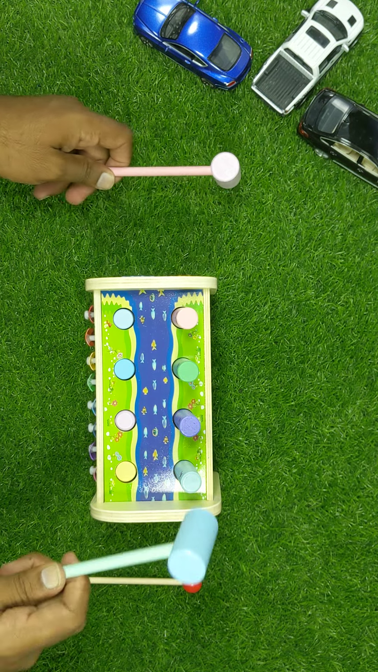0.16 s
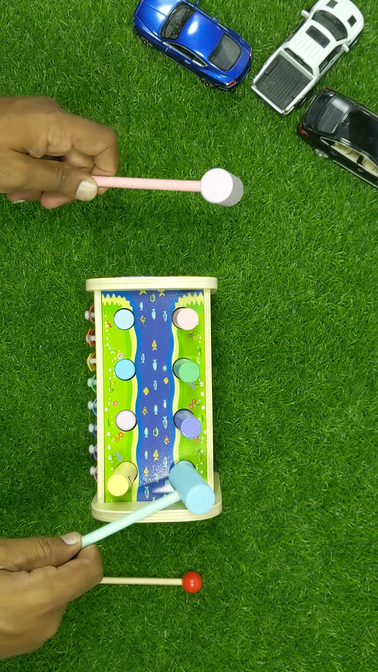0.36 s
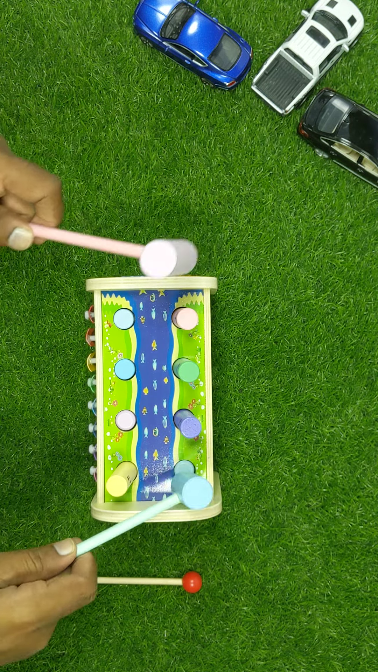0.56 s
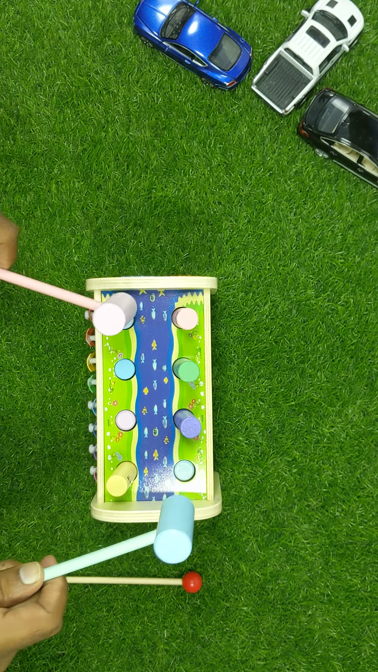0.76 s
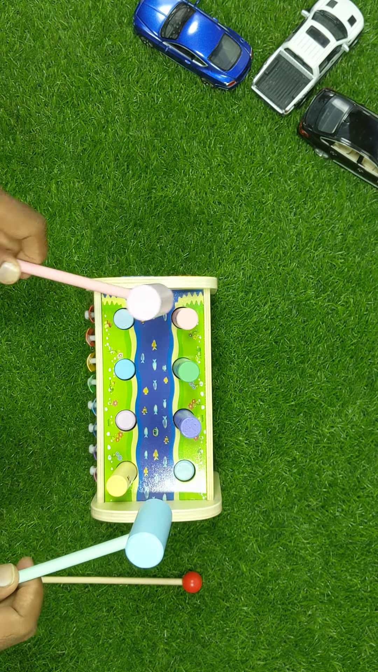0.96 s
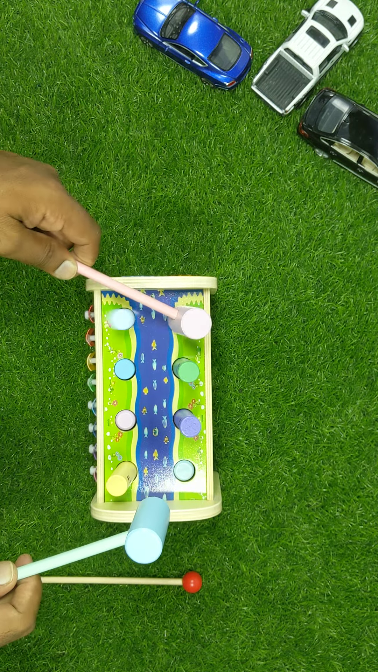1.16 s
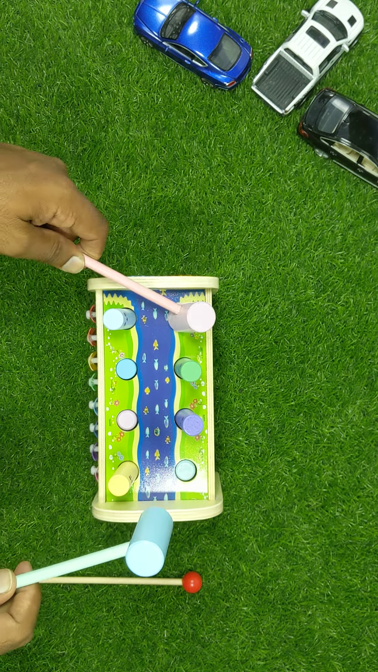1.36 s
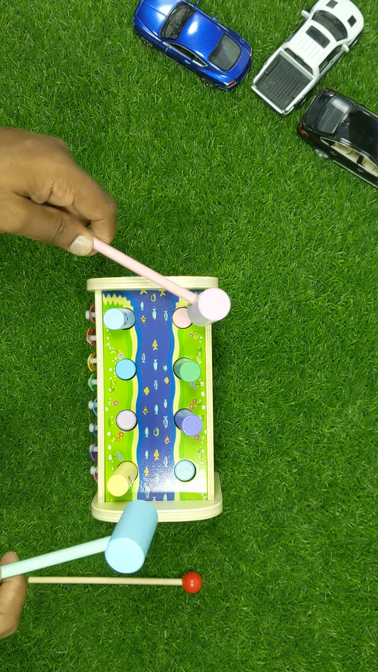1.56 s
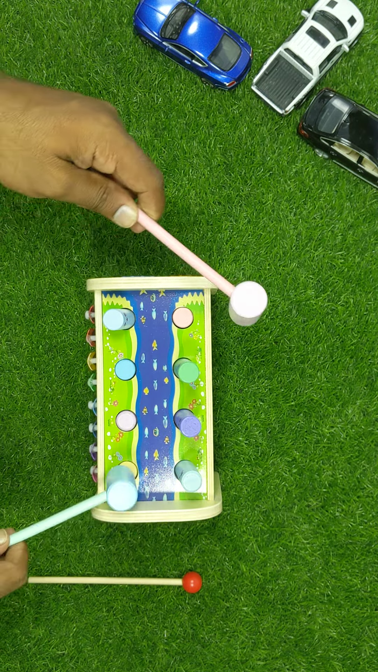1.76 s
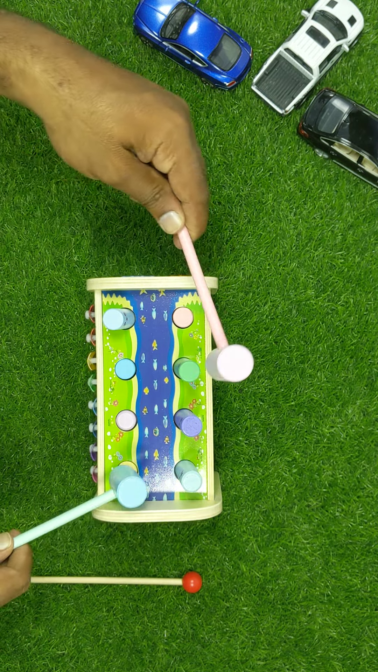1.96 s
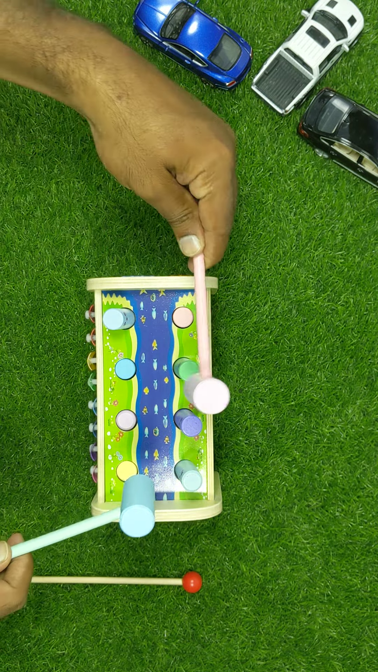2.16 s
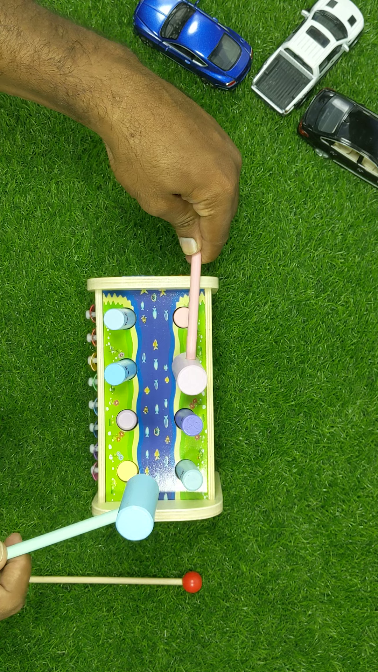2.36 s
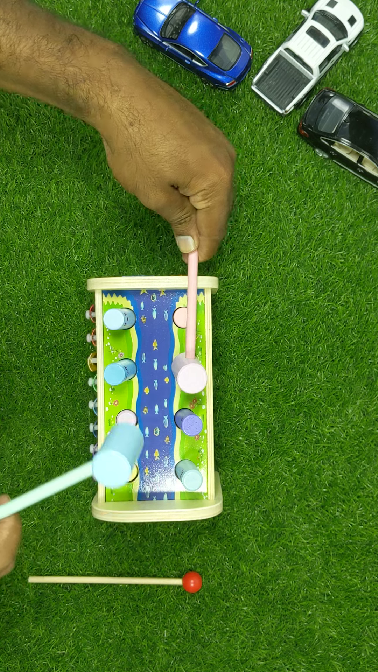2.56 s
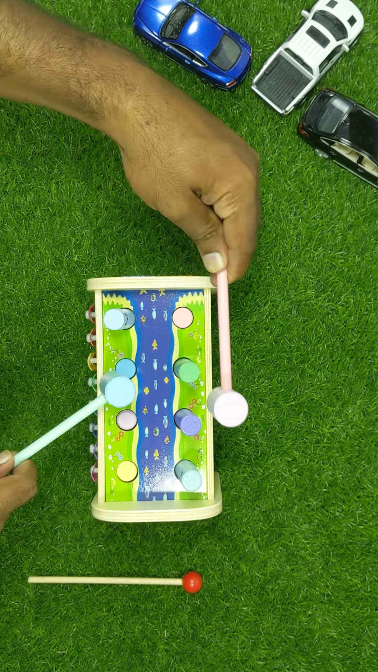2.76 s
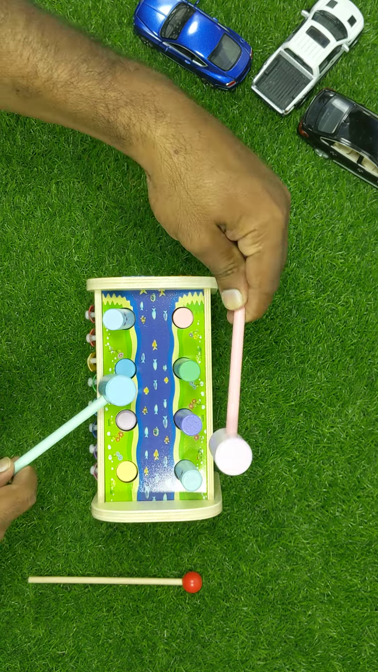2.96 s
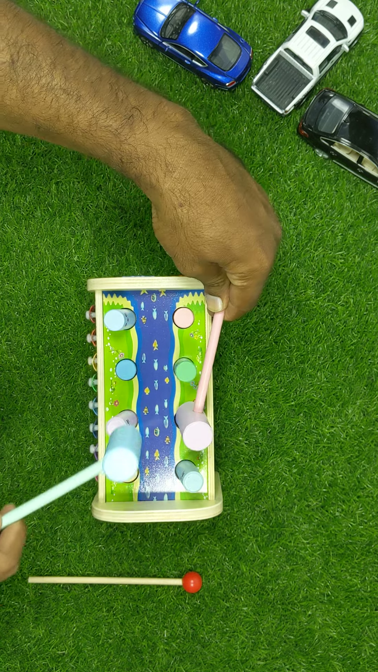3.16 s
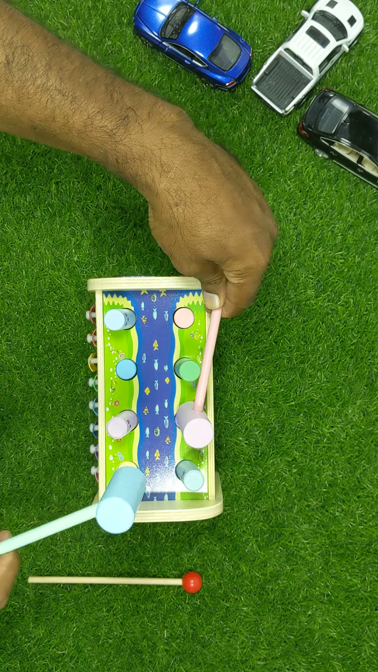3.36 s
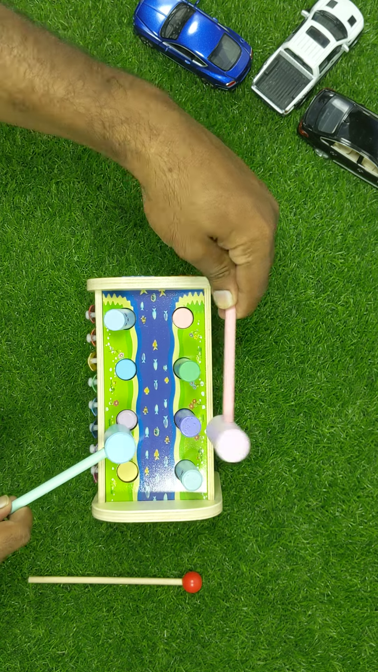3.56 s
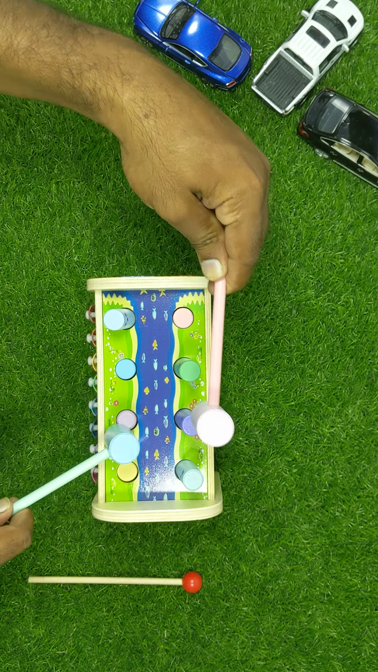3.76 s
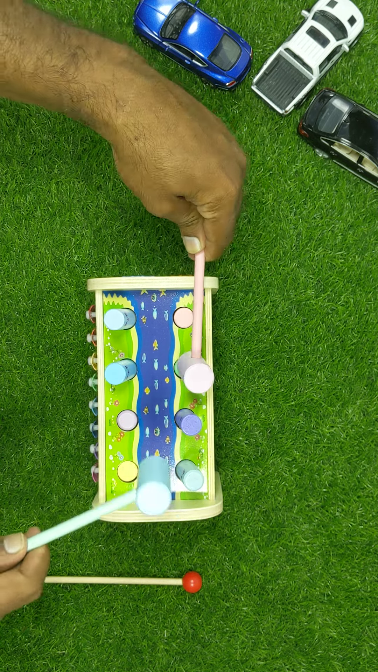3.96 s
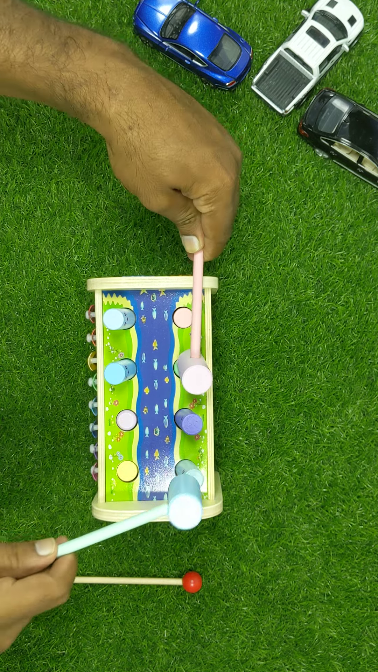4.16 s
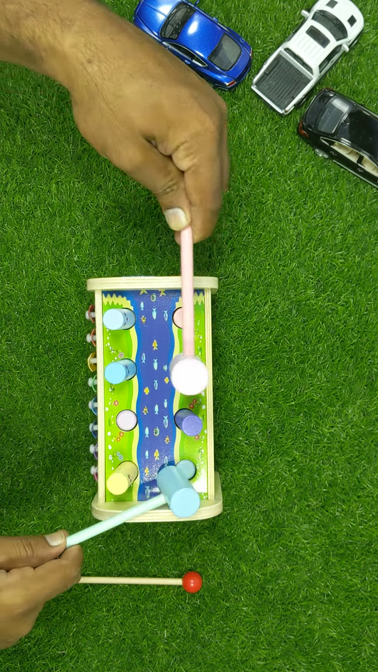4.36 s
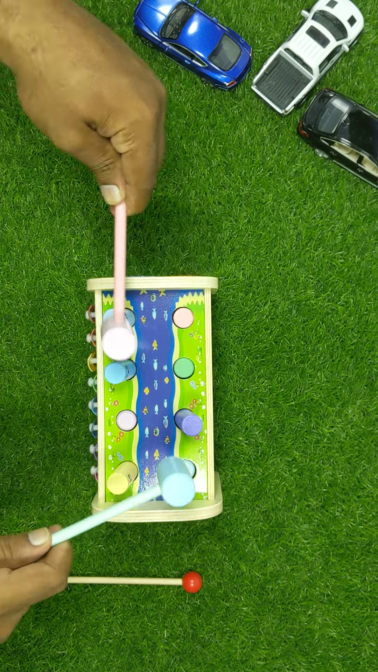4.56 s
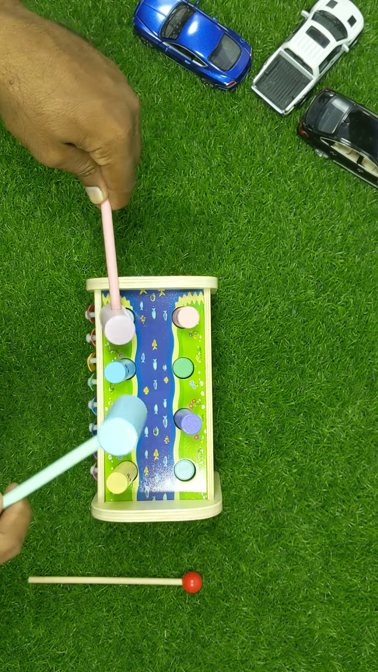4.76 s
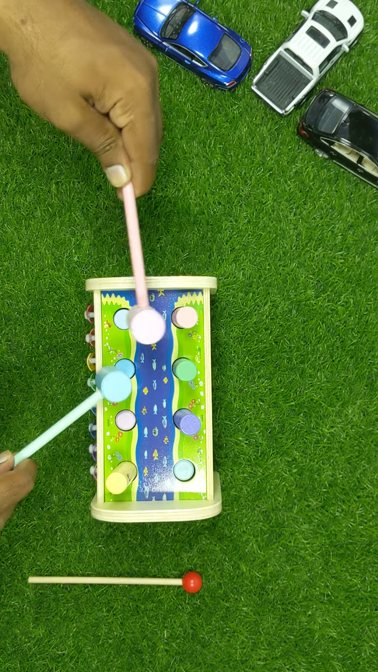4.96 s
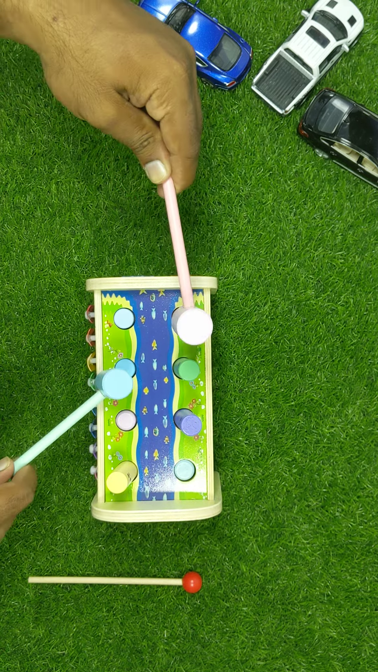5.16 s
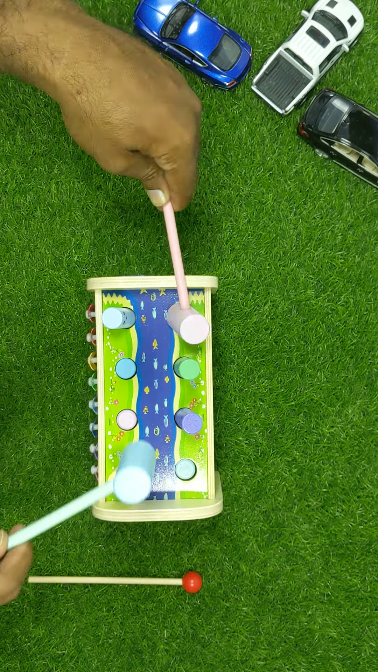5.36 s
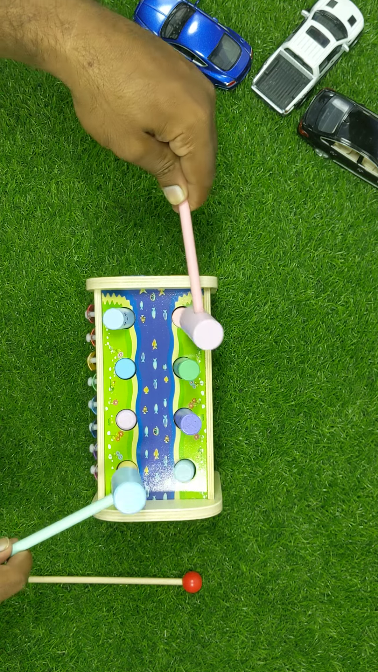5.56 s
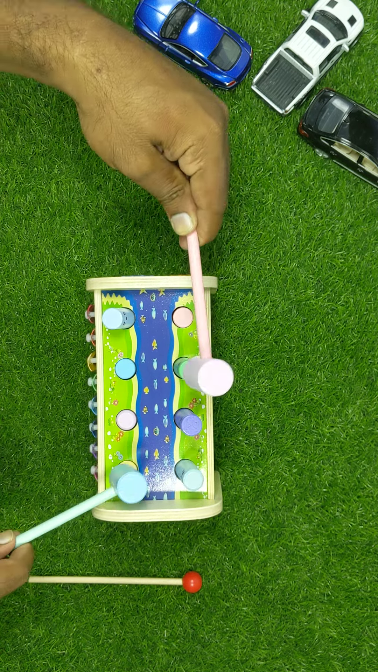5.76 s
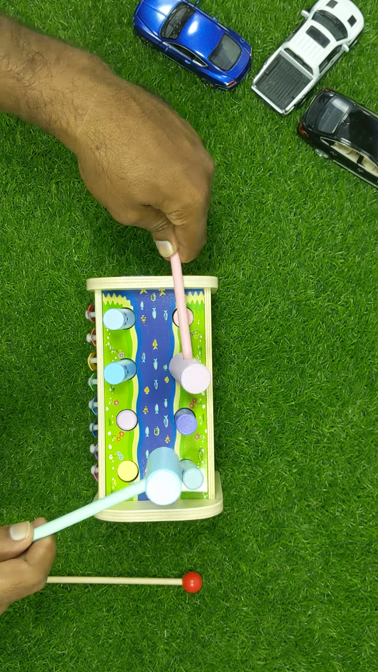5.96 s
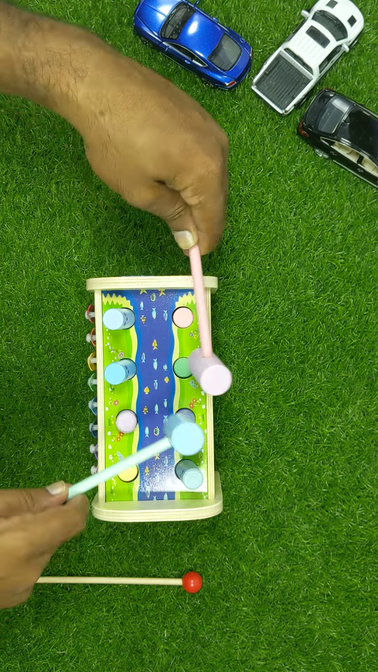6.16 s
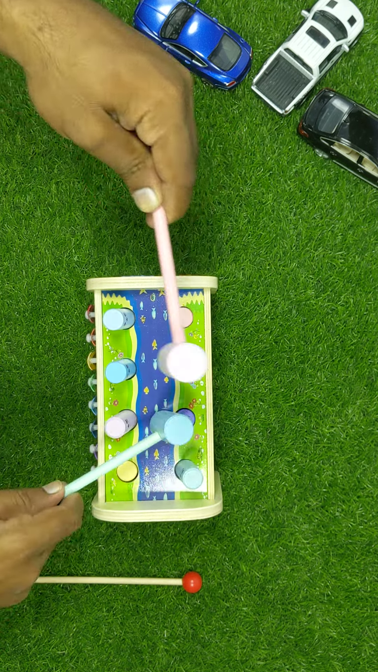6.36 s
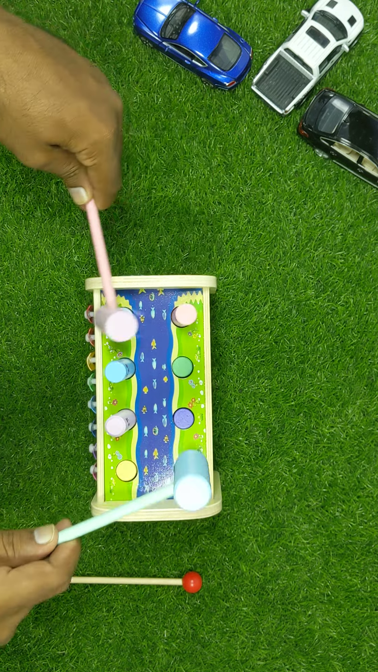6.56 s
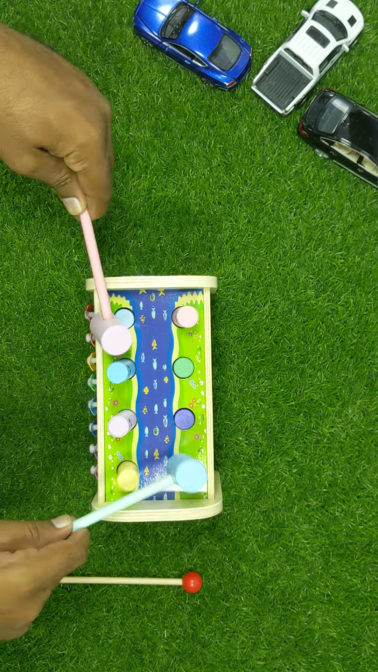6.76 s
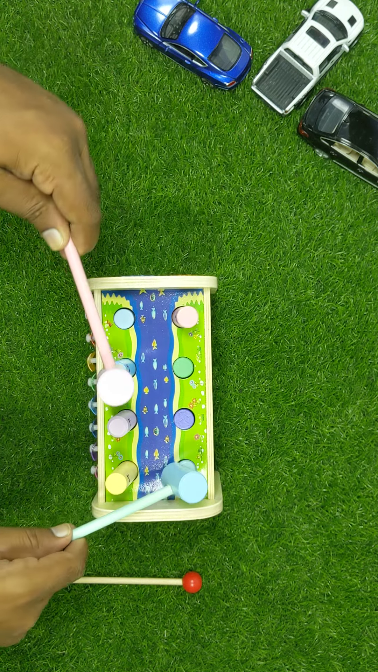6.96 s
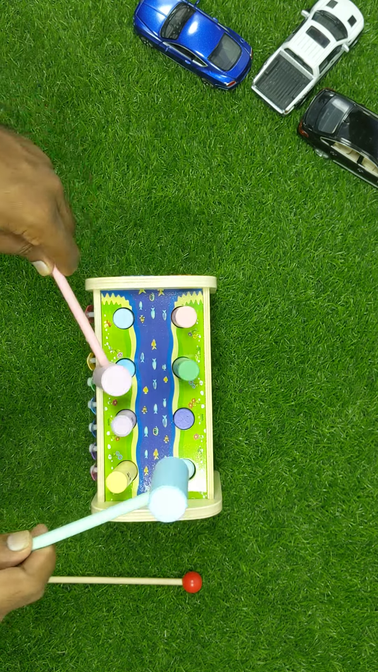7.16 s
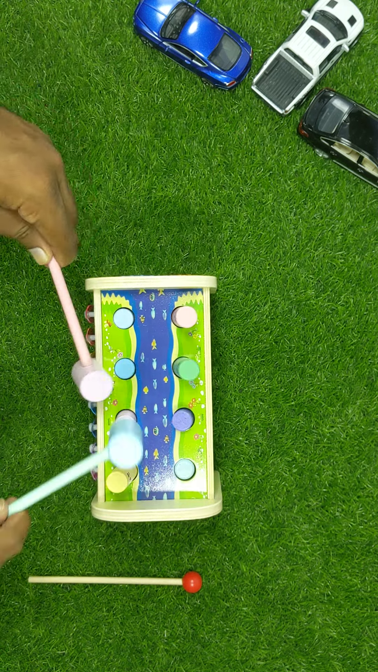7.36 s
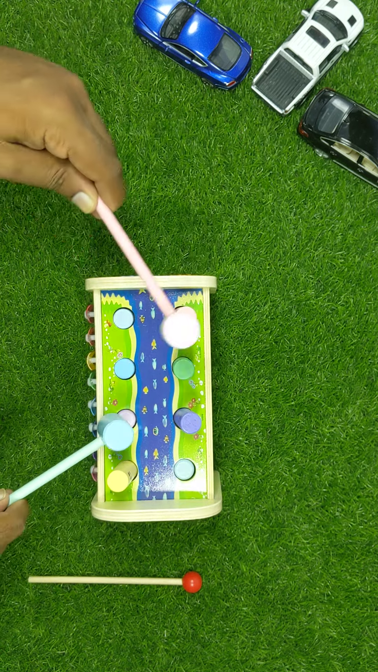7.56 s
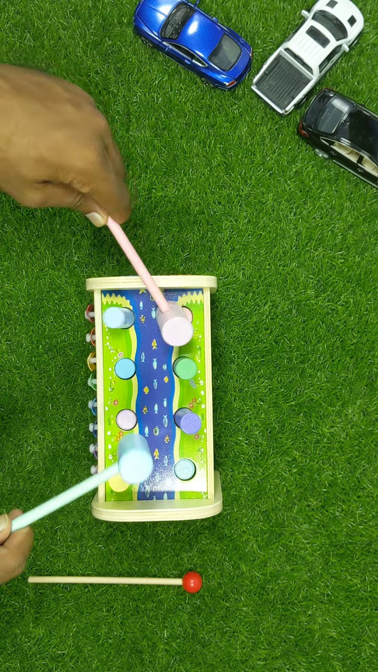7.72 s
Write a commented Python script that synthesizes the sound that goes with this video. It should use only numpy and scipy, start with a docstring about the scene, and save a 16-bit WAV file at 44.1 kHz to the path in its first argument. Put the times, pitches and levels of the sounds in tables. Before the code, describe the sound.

Wooden mallets pound the pegs of a toy bench, starting slowly and then settling into quick, bright clacks over a faint hum.

```python
"""Two wooden mallets pound the pegs of a toy bench, on a covered table in a bare room.
Each stroke is a double knock: the mallet cracks on a peg, and some 45 ms later the peg slams into
its stop. The bench rings briefly, the xylophone bars on its side shiver and the table booms under it.
A pair of microphones hears the bench directly, then nearby things, the walls and the room's tail,
all over a faint hum."""
import sys
import numpy as np
from scipy import signal
from scipy.fft import rfft, irfft, next_fast_len
from scipy.io import wavfile

SR = 44100
rng = np.random.default_rng(int(sys.argv[2]) if len(sys.argv) > 2 else 0)


def materialize(psi):
    """Save the field psi as 16-bit PCM at rate SR to the path in sys.argv[1].

    A 1-D psi becomes a single channel; in a 2-D psi each row is a channel.
    """
    bounded = np.clip(np.atleast_2d(psi).T, -1, 1)
    quanta = np.round(bounded * 32767).astype(np.int16)
    wavfile.write(sys.argv[1], SR, quanta)


N = 347949

# Mallet meets peg. Each row: start in seconds, strength in dB, hardness of the contact in dB,
# favoured pitch in Hz, table boom in dB.
MALLET_BLOWS = [(0.3296, 1.5, 4.5, 9560, -1.5), (1.226, -4, 3, 7150, -19.5), (1.799, 0, 2, 5650, -5),
                (2.2996, -2.5, 0.5, 6240, 0), (2.796, -1, -7, 3700, -8.5), (3.1652, -6, 0, 3960, -6),
                (3.5925, 2, 0, 5780, 0), (3.956, -4, -2, 3640, -1.5), (4.2892, -0.5, 4.5, 7280, 3),
                (4.6717, -3.5, 2, 4200, -1.5), (5.003, 0.5, 0, 2140, -2), (5.3178, -1.5, -2.5, 7400, -7),
                (5.6482, 1.5, 2, 5530, 1), (5.923, -2, 0, 3730, 1), (6.2462, 3, 4, 9260, 3.5),
                (6.5668, 1.5, -2.5, 4160, 2.5), (6.8272, 0.5, 6, 9840, 2), (7.1496, -3, -0.5, 2100, 2),
                (7.4769, 2.5, 3, 8850, 1.5), (7.7782, -3, 2, 2130, -2.5)]
# Peg meets its stop. Each row: start in seconds, strength in dB, hollowness in dB,
# jolt to the frame in dB, favoured pitch in Hz, shake of the bars in dB.
PEG_STOPS = [(0.3614, -4.5, -6, -1, 3290, -7.5), (0.372, -2.5, 0, -3, 2000, -6),
             (1.279, -2.5, -9, -0.5, 2260, -25), (1.8436, -3.5, 2.5, 4, 1960, 0),
             (2.3451, -11.5, 8.5, -2, 2130, 0.5), (2.8418, 6, 2.5, 5.5, 2200, 1.5),
             (3.2116, 4, 7.5, 2, 2770, -23), (3.6411, 6.5, 2, 0.5, 2080, 4),
             (4.0063, 1.5, 6, 1.5, 2200, 11.5), (4.340, -11, 1.5, 2, 2000, -22.5),
             (4.722, -5, 1, 6, 2450, -11), (5.0424, 5.5, -3, 0.5, 2680, -16),
             (5.3628, -3.5, -4, 3, 2070, -4), (5.689, -4.5, 4.5, 0, 2200, 14),
             (5.9738, -0.5, 5, 1, 2080, 6), (6.282, 4, 2.5, -0.5, 2370, 2.5),
             (6.6217, -0.5, -6.5, 5, 2000, -14), (6.8697, -1.5, -6, -5, 2240, -1),
             (7.1905, 1, -4.5, -5, 2340, -5), (7.1975, -2, 4.5, 3, 2100, -16),
             (7.500, 2, 1.5, 0, 2160, -17), (7.823, 2, 4, 2.5, 3280, -11)]
# How alike the two microphones hear the room. Each row: frequency in Hz, likeness from 0 to 1.
MIC_LIKENESS = [(100, 1), (400, 0.92), (1000, 0.49), (2100, 0.69), (3200, 0.039), (15000, 0.046)]


def amp(db):
    """Decibels to amplitude."""
    return 10 ** (np.asarray(db) / 20)


def curve_at(points, hz):
    """A curve joined by straight lines over log frequency."""
    freqs, values = np.transpose(points)
    return np.interp(np.log(hz + 1), np.log(freqs + 1), values)


def add(mix, start_s, sound):
    """Mixes a sound in at its start time."""
    part = mix[:, max(round(start_s * SR), 0):][:, :sound.shape[-1]]
    part += sound[..., :part.shape[1]]


def colour(x, points):
    """Causal filter with the given (Hz, dB) curve."""
    size = next_fast_len(x.shape[-1] + 4096)
    log_gain = np.log(amp(curve_at(points, abs(np.fft.fftfreq(size, 1 / SR)))))
    response = np.exp(np.conj(signal.hilbert(log_gain)))
    return np.fft.ifft(np.fft.fft(x, size) * response).real[:, :x.shape[-1]]


def noise_pair(size, width=1):
    """White noise at the two microphones, alike in the bass; more width makes it less alike."""
    common, separate = rfft(rng.standard_normal((2, size)))
    likeness = np.clip(curve_at(MIC_LIKENESS, np.fft.rfftfreq(size, 1 / SR)), 1e-3, 1) ** width
    right = likeness * common + np.sqrt(1 - likeness ** 2) * separate
    return irfft(np.array([common, right]), size)


def decay_bands(x, t60s):
    """Lets each band die at its own speed."""
    hz, t, bands = signal.stft(x, SR, nperseg=256)
    fade = amp(-60 * t / curve_at(t60s, hz)[:, None])
    return signal.istft(bands * fade, SR)[1][:, :x.shape[-1]]


def ring(modes, t, scatter_db, detune):
    """Damped modes that vary with the spot struck; high ones reach the microphones out of step."""
    out = np.zeros((2, len(t)))
    for hz, db, t60 in modes:
        strength, shift, start, skew = rng.standard_normal(4)
        spread = np.arccos(np.clip(curve_at(MIC_LIKENESS, hz), -1, 1))
        mic_phase = spread * skew * np.array([[.5], [-.5]])
        phase = 2 * np.pi * hz * (1 + detune * shift) * t + np.pi * start + mic_phase
        out += amp(db + scatter_db * strength) * np.exp(-np.log(1000) * t / t60) * np.sin(phase)
    return out


def shaken(modes, rise_s):
    """The long, soft ring of something that the bench shakes."""
    t = np.arange(SR) / SR
    return ring(modes, t, scatter_db=0, detune=0.0016) * (1 - np.exp(-t / rise_s))


def room_tone(air_db=-52, waver=0.64):
    """The still room at the microphones: low rumble, faint hiss and a wavering hum."""
    # Still air. Each row: frequency in Hz, relative density in dB.
    air_spectrum = [(20, -14), (42, 0), (70, -8), (98, -6), (125, -19), (200, -23), (320, -21), (600, -32),
                    (1100, -38), (3000, -42), (8500, -45), (11000, -51), (16000, -53)]
    # The hum. Each row: frequency in Hz, level in dB about which it wavers.
    hum_tones = [(43, -56), (102, -54.5)]
    t = np.arange(N) / SR
    air = colour(noise_pair(N), air_spectrum)
    out = amp(air_db) * air / np.sqrt(np.mean(air ** 2))
    for hz, db in hum_tones:
        drift = np.interp(t, np.linspace(0, t[-1], 40), rng.standard_normal(40))
        out += amp(db) * (1 + waver * drift) * np.sin(2 * np.pi * hz * t + drift)
    return out


def room_tail(bench, wet_db=-29, build_s=0.0054, tails=3, fades_per_s=2.6):
    """The bare room's diffuse tail, crossfading between three random versions of the same decay."""
    # The room's decay. Each row: frequency in Hz, T60 in seconds.
    room_t60 = [(150, 1.09), (400, 0.6928), (1040, 0.6678), (2760, 0.525), (7280, 0.44), (14000, 0.33)]
    # The tail's colour. Each row: frequency in Hz, gain in dB.
    tail_colour = [(100, -7), (330, -9), (500, -9), (650, -4.5), (800, -10), (1130, -5), (1800, -7.5),
                   (2130, -17), (2450, -8), (3400, -5.5), (4100, -9.5), (6000, -9), (9500, -11),
                   (14000, -6)]
    t, out = np.arange(SR) / SR, np.zeros((2, N))
    build_up = 1 - np.exp(-(t / build_s) ** 2)
    turn = np.arange(N) / SR * fades_per_s
    for k in range(tails):
        tail = colour(decay_bands(noise_pair(SR, width=3.5), room_t60), tail_colour) * build_up
        off_turn = abs((turn - k + tails / 2) % tails - tails / 2)
        share = np.cos(np.pi / 2 * np.minimum(off_turn, 1))  # the tails crossfade in a circle
        out += signal.fftconvolve(bench * share, tail, axes=1)[:, :N]
    return amp(wet_db) * out


def reflections(bench):
    """Distinct echoes: off things close by with left and right swapped, then duller off the walls."""
    # Near things and walls. Each row: delay in seconds, gain in dB.
    near_echoes = [(.0026, -30.5), (.0056, -18.5), (0.0129, -18.5)]
    wall_echoes = [(.024, -9), (0.056, -10.5), (.067, -13.5), (.117, -37.5)]
    # What the walls give back. Each row: frequency in Hz, gain in dB.
    wall_colour = [(100, -2), (500, -2), (1100, -8.5), (2200, -20), (8000, -13)]
    out = np.zeros((2, N))
    for sound, echoes in (bench[::-1], near_echoes), (colour(bench, wall_colour), wall_echoes):
        for delay_s, db in echoes:
            add(out, delay_s, amp(db) * sound)
    return out


def table_boom(boom_db=-34):
    """The table top booms under each blow."""
    # The table's modes. Each row: frequency in Hz, relative level in dB, T60 in seconds.
    table_modes = [(44, 2, 0.36), (63.25, 1.5, 1), (118.4, -5.5, 1), (194, -7, 0.38)]
    out = np.zeros((2, N))
    for start_s, *_, weight_db in MALLET_BLOWS:
        add(out, start_s, amp(boom_db + weight_db) * shaken(table_modes, rise_s=0.014))
    return out


def registers(drive_db, strength_db, hard_db=0, hollow_db=0, jolt_db=0):
    """Levels in dB of the bench's six registers, low to high, for one contact."""
    frame = 0.26 * strength_db + jolt_db  # the heavy frame gains little from a stronger blow
    board = strength_db + hollow_db
    panel = strength_db + 0.25 * hollow_db
    peg = strength_db
    clack = strength_db + 0.12 * hard_db
    snap = strength_db + hard_db
    return np.add(drive_db, [frame, board, panel, peg, clack, snap])


def knock(levels_db, pitch_hz, favour_db, rise_s, modes_db, t60_scale,
          crack=1.2, crack_s=0.0069, octaves=0.16, size=8192):
    """Wood on wood: clear modes over a crowd of weak ones; the contact sets each register's level."""
    # Modes of bench and pegs. Each row: frequency in Hz, relative level in dB, T60 in seconds.
    wood_modes = [(293.2, -12.5, 0.13), (343, -13.5, 0.23), (402, -2, 0.04), (481.3, 0.5, 0.067),
                  (562.5, -4, 0.092), (600, -8.5, .07), (815, -2.5, 0.062), (1052, -10, 0.15),
                  (1099, -13.5, 0.14), (2121, 12, 0.015), (2550, -5, .05), (3044, -8, .06),
                  (3304, -2.5, 0.029), (3900, 0.5, 0.019), (4025, 1, 0.033), (5870, 3, .022),
                  (7500, 3, 0.035), (9570, 6, 0.026), (9300, -3, 0.036)]
    # The crowd of weak modes. Each row: frequency in Hz, relative density in dB.
    crowd_colour = [(60, -11), (160, -16.5), (235, -11.5), (290, -7), (400, 3), (1100, 7.5), (1700, 2.5),
                    (2300, 4.5), (5000, -1), (7400, 5), (8500, -0.5), (9900, -1), (11000, -5), (16000, -15)]
    # Its decay. Each row: frequency in Hz, T60 in seconds before scaling.
    crowd_t60 = [(300, 0.096), (1000, 0.041), (3000, 0.052), (8000, 0.072), (14000, 0.07)]
    # Bounds in Hz of the registers frame, board, panel, peg, clack and snap.
    edges_hz = [250, 420, 700, 1800, 2600, 6000, 16000]
    t, hz = np.arange(size) / SR, np.fft.rfftfreq(size, 1 / SR)
    t60s = [(f, t60 * t60_scale) for f, t60 in crowd_t60]
    crowd = colour(decay_bands(noise_pair(size), t60s), crowd_colour)
    wood = crowd + amp(modes_db) * ring(wood_modes, t, scatter_db=0.2, detune=0.013)
    # the first milliseconds of contact stand out of the ring
    wood *= (1 - np.exp(-t / rise_s)) * (1 + crack * np.exp(-t / crack_s))
    power = (abs(rfft(wood)) ** 2).mean(0) / size
    contact = []
    for low, high, db in zip(edges_hz, edges_hz[1:], levels_db):
        gain_db = db - 10 * np.log10(power[(hz >= low) & (hz < high)].sum())
        contact += [(low * 1.12, gain_db), (high / 1.12, gain_db)]
    # the spot struck favours the modes around one pitch
    spot = [(pitch_hz / 2 ** octaves, 0), (pitch_hz, favour_db), (pitch_hz * 2 ** octaves, 0)]
    return colour(colour(wood, contact), spot)


def peg_chatter(slide_s=0.009, peg_hz=2150, ticks=12):
    """The tight peg chatters in its hole during the last milliseconds before it seats."""
    # A sliding peg's drive in dB for each register, frame to snap.
    slide_drive = [-18.5, -21.5, -10, -13, -10, -20]
    out = np.zeros((2, N))
    for stop_s, strength, hollow, *_ in PEG_STOPS:
        levels_db = registers(slide_drive, strength, hollow_db=hollow)
        tick = knock(levels_db, peg_hz, favour_db=10.5, rise_s=0.0005, modes_db=-3,
                     t60_scale=0.7, octaves=0.15)
        for early, weight in rng.random((ticks, 2)):
            add(out, stop_s - early * slide_s, weight / np.sqrt(ticks) * tick)
    return out


def peg_landings(bars_db=-38):
    """Each peg lands on its stop with a hollow knock that stirs the xylophone bars."""
    # A landing's drive in dB for each register, frame to snap.
    stop_drive = [-2.5, 4, 1, 1.5, 3.5, -6.5]
    # The bars' modes. Each row: frequency in Hz, relative level in dB, T60 in seconds.
    bar_modes = [(1089, -8, 0.87), (1137, 3.5, 0.29), (1144, -7, 0.61), (1206, -6.5, 0.67),
                 (2250, -14.5, 0.6), (3270, -12.5, .4)]
    out = np.zeros((2, N))
    for start_s, strength, hollow, jolt, pitch_hz, shake in PEG_STOPS:
        levels_db = registers(stop_drive, strength, hollow_db=hollow, jolt_db=jolt)
        add(out, start_s, knock(levels_db, pitch_hz, favour_db=6, rise_s=0.0025, modes_db=-10.5,
                                t60_scale=1.08, crack=2.8))
        add(out, start_s, amp(strength + shake + bars_db) * shaken(bar_modes, rise_s=0.003))
    return out


def mallets():
    """Hard, bright cracks on the peg tops, and a few light touches."""
    # Light touches and rebounds. Each row: start in seconds, strength in dB, hollowness in dB,
    # favoured pitch in Hz.
    touches = [(2.33, -22.5, -8, 317), (3.580, -18, 13.5, 550), (5.951, -3.5, -9, 3230),
               (6.665, -12, 4.5, 566)]
    # A blow's and a touch's drive in dB for each register, frame to snap.
    blow_drive = [-9, -4.5, 0.34, 2.05, 6, 3]
    touch_drive = [-4, 3, 2, -2.5, -6, -11.5]
    hits = [(start_s, registers(blow_drive, strength, hard_db=hard), pitch_hz)
            for start_s, strength, hard, pitch_hz, _ in MALLET_BLOWS]
    hits += [(start_s, registers(touch_drive, strength, hollow_db=hollow), pitch_hz)
             for start_s, strength, hollow, pitch_hz in touches]
    out = np.zeros((2, N))
    for start_s, levels_db, pitch_hz in hits:
        add(out, start_s, knock(levels_db, pitch_hz, favour_db=6, rise_s=0.0014, modes_db=-14,
                                t60_scale=0.77, crack=0.32))
    return out


def scene():
    """The bench in its room, heard a little differently by each microphone."""
    # Balance of the microphones. Each row: frequency in Hz, left minus right in dB.
    mic_balance = [(400, -1), (680, 0.5), (1200, 0.9), (2200, -0.5), (4700, -1.5), (6500, -0.5),
                   (8700, -0.5), (11500, -5.5), (14000, -0.5)]
    bench = mallets() + peg_landings() + peg_chatter()
    left, right = bench + reflections(bench) + room_tail(bench)
    left = colour(left[None], [(hz, db / 2) for hz, db in mic_balance])
    right = colour(right[None], [(hz, -db / 2) for hz, db in mic_balance])
    return np.vstack([left, right]) + table_boom() + room_tone()


def record(dry, ceiling=0.64, cutoff_hz=16000):
    """The recorder rounds off the loudest peaks, then cuts the highest treble."""
    rounded = dry / (1 + (dry / ceiling) ** 4) ** (1 / 4)
    lowpass = signal.firwin(255, cutoff_hz, window=("kaiser", 9), fs=SR)
    return signal.oaconvolve(rounded, lowpass[None], "same")


dry = scene()
out = record(dry)
materialize(out)
```